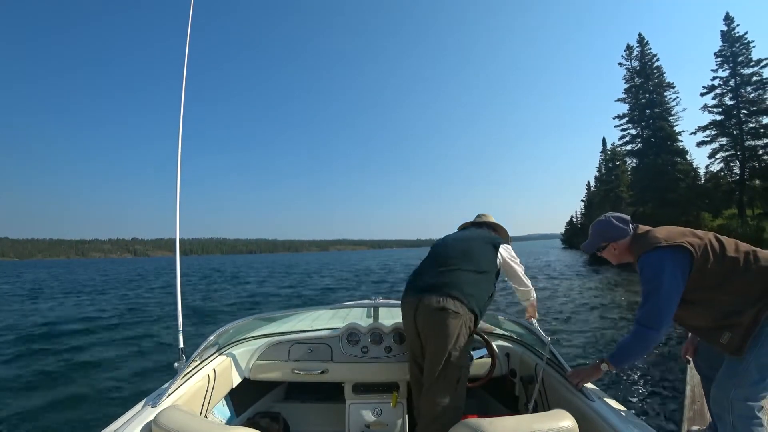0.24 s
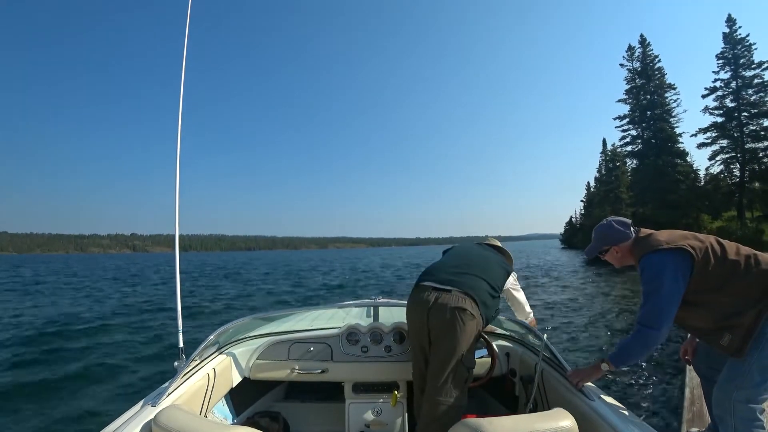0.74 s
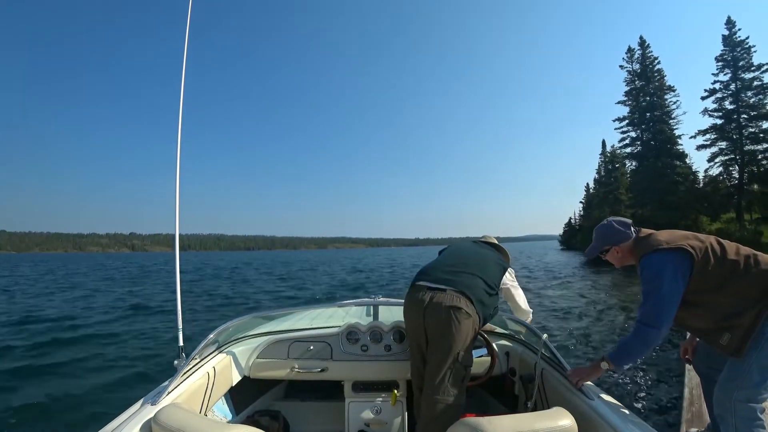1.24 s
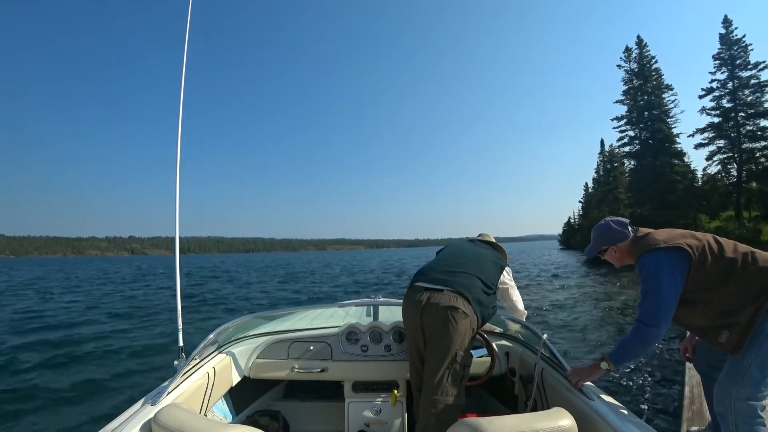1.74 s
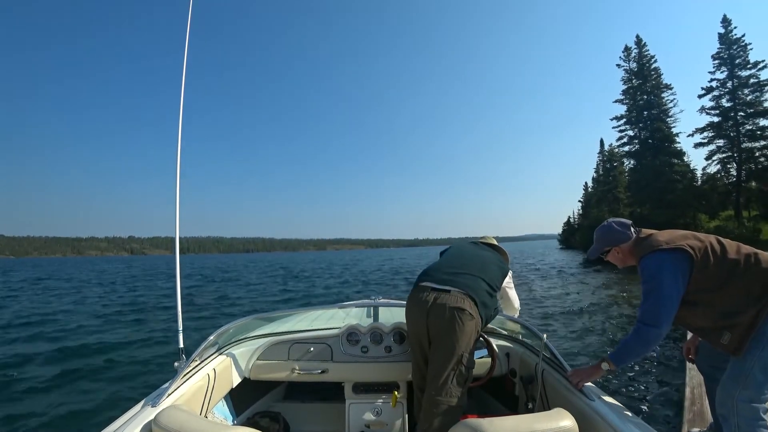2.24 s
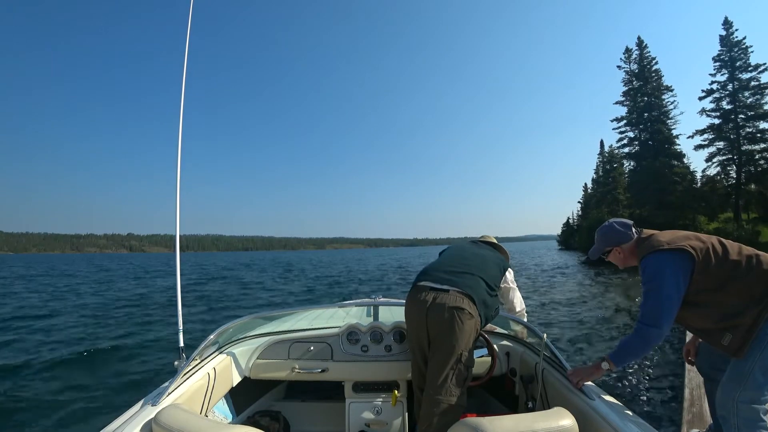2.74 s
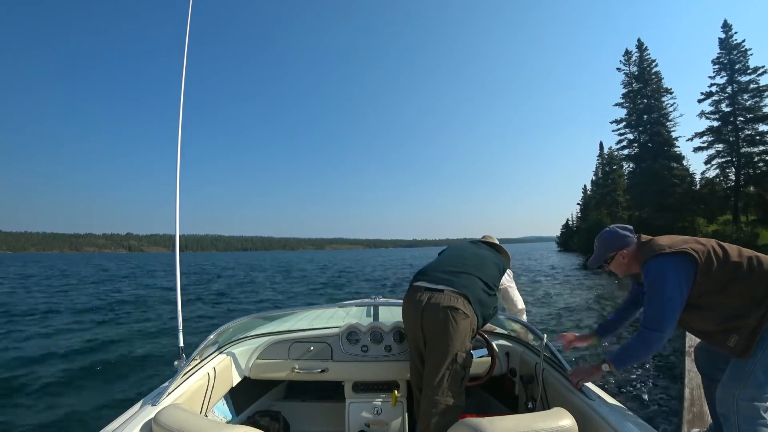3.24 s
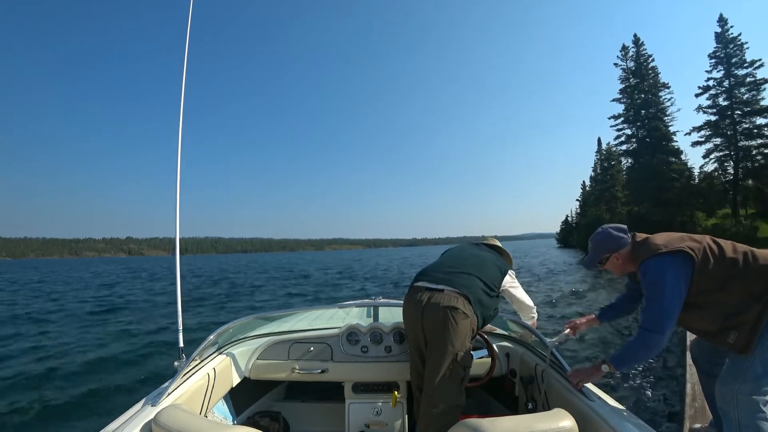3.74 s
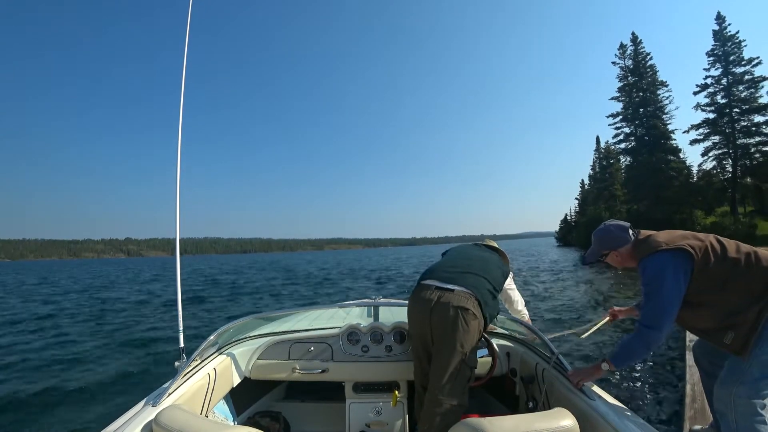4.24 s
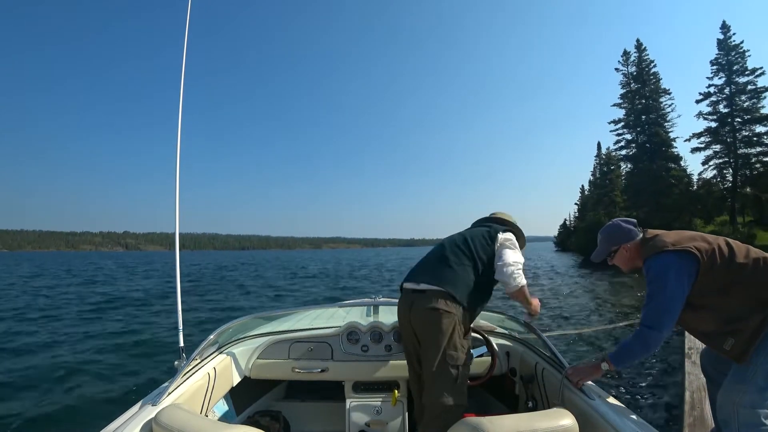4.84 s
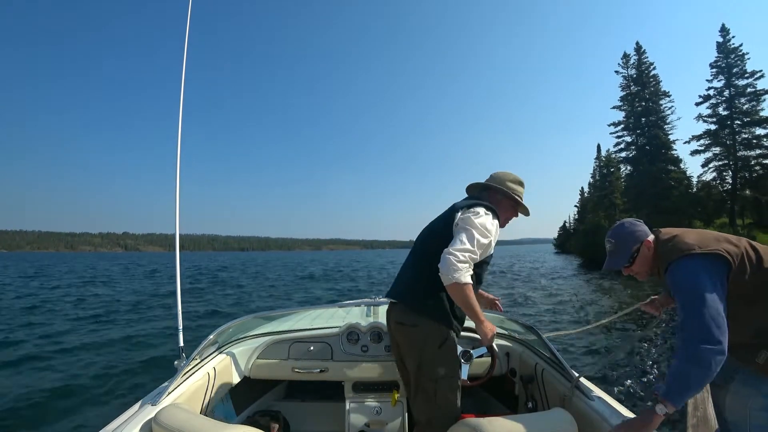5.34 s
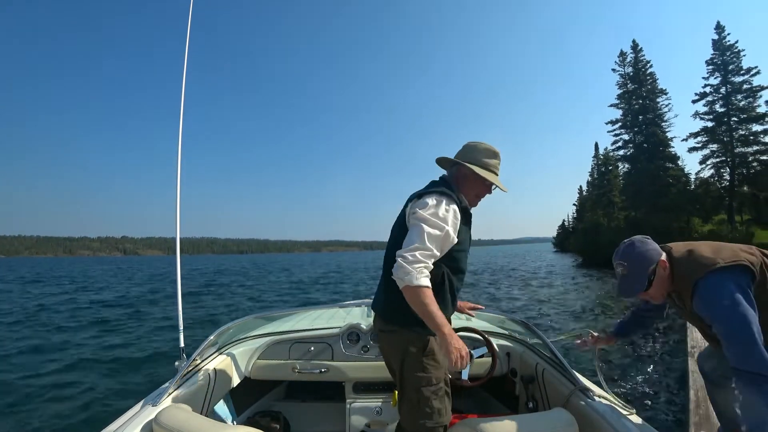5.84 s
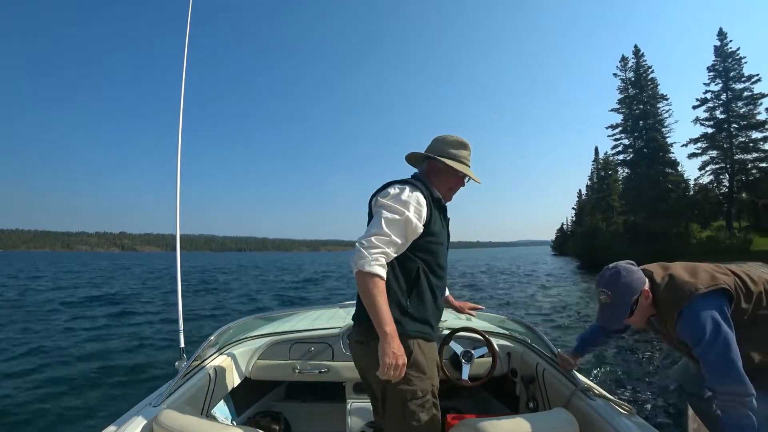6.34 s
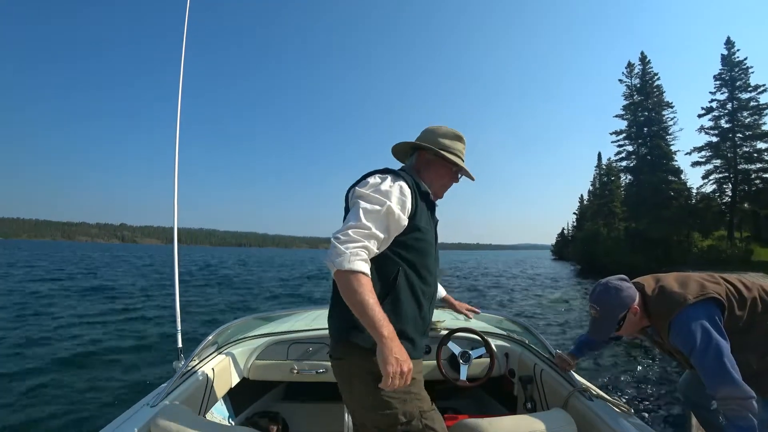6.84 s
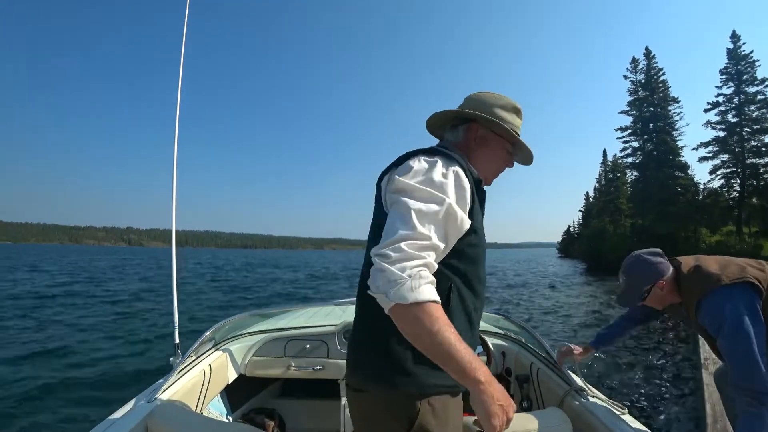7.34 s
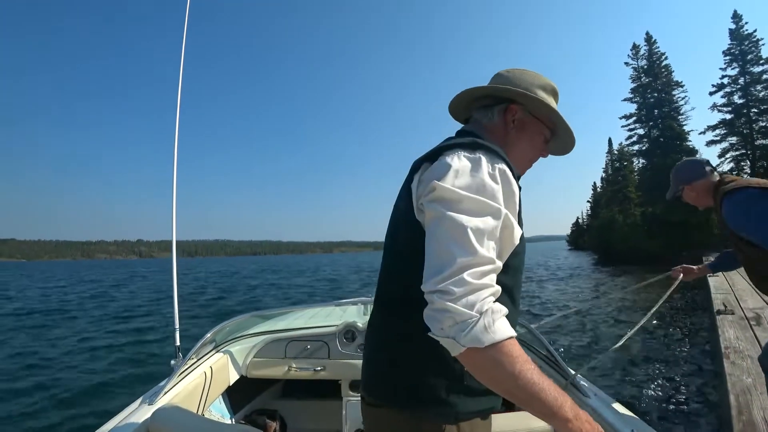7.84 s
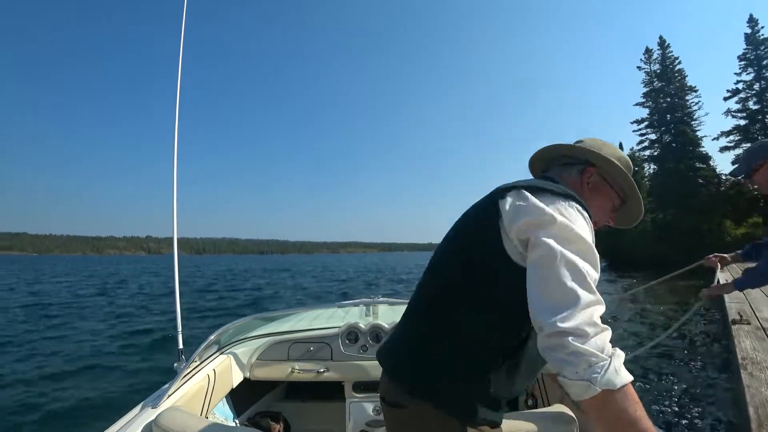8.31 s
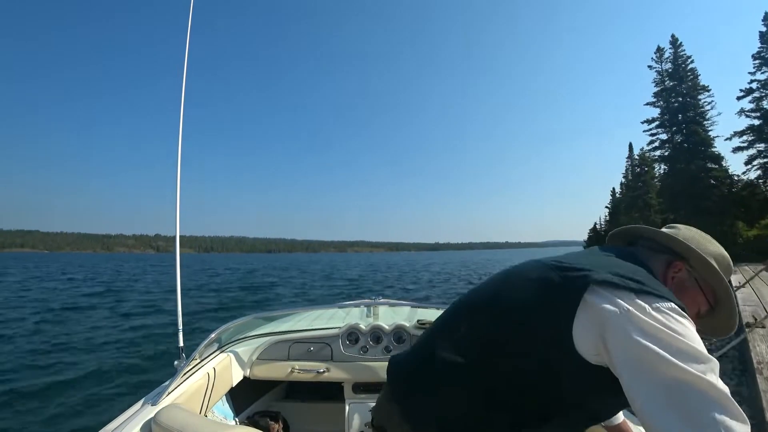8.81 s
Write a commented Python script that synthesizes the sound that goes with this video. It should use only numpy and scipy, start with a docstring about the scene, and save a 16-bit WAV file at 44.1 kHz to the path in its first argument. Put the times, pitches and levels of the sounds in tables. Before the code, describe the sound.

Water slaps, gulps and gurgles against a small moored motorboat while a deep boom throbs and wind gusts buffet, heard muffled from on board.

```python
"""At the dock of a breezy lake, on board a small open motorboat, engine off; two camera ports listen from a closed case.
Filtered noise makes swells boom in one deep resonance, gusts buffet the boat and waves slap and spray the hull.
Decaying sines make the gulping air pockets, waterline gurgles and knocking panels; the knocks rattle with noise too.
Farther off is the even wash of the lake, as shaped noise with the camera's hiss; its circuits whine as thin tones.
Late on, a fitting chirps under the rope and small fittings tick as it is handled."""
import sys
import numpy as np
from scipy import signal
from scipy.fft import rfft, irfft
from scipy.io import wavfile
from scipy.ndimage import uniform_filter1d

SR = 44100
rng = np.random.default_rng(int(sys.argv[2]) if len(sys.argv) > 2 else 0)


def unload_audio(sound):
    """Save the sound as a 16-bit wav file, at the path given as the first command line argument."""
    columns = np.transpose(np.atleast_2d(sound))
    # keep every value between -1 and 1, then stretch to whole-number steps
    steps = np.round(np.clip(columns, -1, 1) * 32767)
    wavfile.write(sys.argv[1], SR, steps.astype(np.int16))


N = 399987
TIME = np.arange(N) / SR


def undb(db):
    """Decibels to amplitude gain."""
    return 10 ** (np.asarray(db) / 20)


def unit(x):
    """Scale to rms 1."""
    return x / np.sqrt(np.mean(x ** 2))


def curve(rows):
    """A (seconds, value) table joined by straight lines."""
    return np.interp(TIME, *np.transpose(rows))


def walk(rate):
    """Smooth chance with rms 1, drawing a new target about rate times a second."""
    hold = int(SR / rate)
    steps = np.repeat(rng.standard_normal(N // hold + 1), hold)
    return unit(uniform_filter1d(steps, hold)[:N])


def band(x, lo_hz, hi_hz, order=2):
    """Causal band-pass."""
    sos = signal.butter(order, [lo_hz, hi_hz], "band", fs=SR, output="sos")
    return signal.sosfilt(sos, x)


def resonate(x, hz, width_hz):
    """One resonance, gain 1 at its centre."""
    return signal.lfilter(*signal.iirpeak(hz, hz / width_hz, fs=SR), x)


def coloured(noise, points):
    """Give noise a spectrum drawn through (Hz, dB) points on a log frequency axis, rms 1."""
    hz, db = np.transpose(points)
    bins = np.arange(N // 2 + 1) * SR / N
    gain = undb(np.interp(np.log(bins + 1), np.log(hz), db))
    return unit(irfft(rfft(noise) * gain, N))


def ports(mid, side):
    """Common and opposed parts to the left and right ports."""
    return np.array([mid + side, mid - side])


# What hull and case ring with.
# Each row: pitch in Hz, width in Hz, gain in dB common to both ports, gain in dB opposed between them.
MODES = [(120, 11, -7.5, -13), (151.9, 23.2, -1.5, -22), (207, 54.4, -5, -4), (245.7, 6.4, -4.5, -2),
         (284.7, 14, -9.5, -18), (345.4, 25.5, -4, 2), (405.5, 24, -13, -17.5), (449.7, 9.5, -7, -37),
         (611.2, 21, -10, -37), (685, 44, -36, -18), (753, 56, -17, -7), (1063, 93, -5, -5.5),
         (1260, 630, -12.5, -15)]


def hull(push, lean=0.7):
    """Two unrelated pushes ring the modes; the dock side, to the right, is a little louder."""
    across = push[1] - lean * push[0]
    mid = sum(undb(db) * resonate(push[0], hz, width) for hz, width, db, _ in MODES)
    side = sum(undb(db) * resonate(across, hz, width) for hz, width, _, db in MODES)
    return ports(mid, side)


# Swells under the boat that set the deep resonance booming.
# Each row: crest in seconds, level in dB, time from crest to 1/e on the falling side in seconds.
SWELLS = [(0.022, -31.5, 0.051), (0.161, -33, 0.059), (0.578, -29, 0.051), (0.796, -25, 0.019),
          (0.877, -28.5, 0.014), (1.028, -37, 0.29), (1.81, -39, 0.1), (2.017, -32, 0.039),
          (2.55, -35.5, 0.054), (2.892, -24, 0.043), (3.21, -38.5, 0.069), (3.706, -30.5, 0.11),
          (3.878, -29, 0.1), (4.605, -27.5, 0.044), (4.686, -27, 0.02), (5.035, -40, 0.22),
          (5.403, -26, 0.038), (5.468, -29.5, 0.095), (5.695, -36.5, 0.07), (5.861, -31, 0.059),
          (6.2, -34.5, 0.061), (6.323, -27, 0.031), (6.421, -25, 0.078), (6.86, -32.5, 0.042),
          (7.067, -18, 0.064), (7.144, -22, 0.073), (7.357, -24.5, 0.016), (7.419, -29, 0.041),
          (7.574, -32.5, 0.049), (7.972, -34, 0.16), (8.62, -34.1, 0.12), (8.769, -26, 0.014),
          (8.869, -24.5, 0.08)]
SWELL_RISE, SWELL_ROUNDNESS = 0.78, 1.96  # rise time as a share of the fall; 2 = bell-shaped crest
CHOP_DB, CHOP_SPREAD_DB, CHOP_PER_S = -47, 5, 16  # small waves keep it stirring between the swells
BOOM_HZ, BOOM_WIDTH_HZ = 63.5, 10.8  # width of each of two resonances in a row


def heave():
    """Strength of the boom: each swell builds and ebbs in one rounded arch, over restless chop."""
    power = undb(CHOP_DB + CHOP_SPREAD_DB * walk(CHOP_PER_S)) ** 2
    for crest, db, length in SWELLS:
        away = np.abs(TIME - crest) / np.where(TIME < crest, SWELL_RISE * length, length)
        arch = np.exp(-np.minimum(away, 10) ** SWELL_ROUNDNESS)
        power = power + (undb(db) * arch) ** 2
    return np.sqrt(power)


def boom(rumble_db=-15.0, rumble_follow=0.68, side_db=-13, shudder_db=-23):
    """A narrow resonance throbs and wanders in pitch, with rumble and shudder around it and eddies opposed at the ports."""
    strength = heave()
    ring = rng.standard_normal(N)
    for _ in range(2):
        ring = resonate(ring, BOOM_HZ, BOOM_WIDTH_HZ)
    ring = signal.hilbert(ring)
    # the small power evens out the resonance's own throbbing
    tone = unit(band(np.abs(ring) ** .2 * np.cos(np.angle(ring)), 46, 84))
    # the rumble follows the swells less than fully
    mean = strength.mean()
    rumble = unit(band(rng.standard_normal(N), 30.7, 48.4)) * mean * (strength / mean) ** rumble_follow
    shudder = unit(band(rng.standard_normal(N), 73, 98.5, order=3))
    eddies = unit(band(rng.standard_normal(N), 49.2, 80.0))
    throbbing = strength * ports(tone + undb(shudder_db) * shudder, undb(side_db) * eddies)
    return throbbing + undb(rumble_db) * rumble


# Wind buffeting the boat, and gurgling water between the slaps.
# Each row: time in seconds, gust level in dB, to which each sound adds its own offset.
GUST = [(0.0, -38), (0.33, -66.5), (1.79, -57), (1.94, -43), (2.17, -63.5), (3.08, -61), (3.28, -52.5),
        (4.05, -50.5), (4.45, -58), (4.8, -53), (5.13, -61), (6.09, -61), (6.19, -44), (6.5, -53),
        (7.2, -45.5), (8.0, -50), (8.45, -55), (8.74, -43), (9.0, -50)]


def buffeting(deep_db=4, light_db=-1.0, light_follow=0.82, flutter_db=3, tumble_db=3, split_hz=250, top_hz=560):
    """Fluttering pressure shakes the lower modes; a strong gust feeds the deep eddies more than the light ones."""
    gust = curve(GUST)
    shaken = hull(rng.standard_normal((2, N)) * undb(flutter_db * walk(30)))
    deep = unit(band(shaken, 70.4, split_hz, order=3) * undb(tumble_db * walk(11)))
    light = unit(band(shaken, split_hz, top_hz) * undb(tumble_db * walk(17)))
    light_gust = gust.mean() + light_follow * (gust - gust.mean())
    return deep * undb(gust + deep_db) + light * undb(light_gust + light_db)


# The far wash of the lake and the hiss: the part common to both ports.
# Each row: frequency in Hz, relative density in dB per Hz.
WASH_MID = [(100, 5.5), (250, -7), (460, -4), (540, -9.5), (880, -6.5), (1140, 1.5), (1260, -2.5),
            (1970, -5), (2060, -10), (3200, -18), (5300, -20), (6000, -23.5), (8400, -23), (9100, -26.5),
            (10200, -21.5), (15500, -24)]
# The part opposed between the ports.
# Each row: frequency in Hz, relative density in dB per Hz.
WASH_SIDE = [(100, 4), (230, -3), (370, 1.5), (950, 4.5), (1500, 3.5), (1900, 5), (2100, -0.5), (2600, -7),
             (5000, -15.5), (7000, -21), (9100, -22.5), (10700, -20), (12500, -25)]
WASH_MID_DB, WASH_SIDE_DB = -58.5, -55.5  # rms levels


def lake(shore_share=0.4):
    """Distant wavelets and wind in trees merge to an even wash, dulled by the case; the shore's part trails on the left."""
    near, wide = rng.standard_normal((2, N))
    late = signal.hilbert(near).imag  # a quarter cycle behind at every frequency
    mid = coloured(near, WASH_MID) * undb(WASH_MID_DB)
    side = coloured(wide + shore_share * late, WASH_SIDE) * undb(WASH_SIDE_DB)
    return ports(mid, side)


# The camera's circuits, right at the ports, sing briefly about twice a second.
# Each entry: start in seconds.
WHINES = [0, .51, 1.49, 1.93, 2.46, 3.011, 3.541, 4.53, 5.08, 5.51, 6.05, 6.481, 7.462, 8.0, 8.42]


def circuits(whine_hz=5570.0, whine_db=-70, length_s=0.091, whistle_hz=10590, waver_hz=70, flicker_db=1,
             whistle_db=-78.0, throb_hz=30, throb_db=2.5):
    """Short electrical whines on the left, over a thin wavering whistle that throbs evenly."""
    on = sum(1. * ((TIME > s) & (TIME < s + length_s)) for s in WHINES)
    gate = uniform_filter1d(on, size=200)  # softened edges
    whine = undb(whine_db) * gate * np.sin(2 * np.pi * whine_hz * TIME)
    throb = throb_db * np.sin(2 * np.pi * throb_hz * TIME)
    level = undb(whistle_db + throb + flicker_db * walk(140))
    phase = 2 * np.pi * np.cumsum(whistle_hz + waver_hz * walk(150)) / SR
    whistle = level * np.sin(phase)
    return np.array([whine + whistle, whistle])


SPLASH_TOP_HZ, SPLASH_TOP_AT_DB, SPLASH_DB_PER_OCTAVE = 674, -34.5, 62.5  # a harder splash reaches higher
THUMP_DB_PER_OCTAVE = 68  # a wave that is more thump than splash is duller


def splash_top(thump_db, splash_db):
    """Upper edge of a splash in Hz: higher the harder it is, lower the more the thump outweighs it."""
    octaves = (splash_db - SPLASH_TOP_AT_DB) / SPLASH_DB_PER_OCTAVE + (splash_db - thump_db) / THUMP_DB_PER_OCTAVE
    return SPLASH_TOP_HZ * 2 ** octaves


# Waves that hit the hull.
# Each row: start in seconds, rise in seconds, thump in dB and splash in dB, each before its common offset.
SLAPS = [(0, 0.0089, -34.5, -47), (0.091, 0.027, -42.5, -45.5), (0.495, 0.033, -48, -48.5),
         (0.742, 0.019, -43, -38.5), (0.913, 0.012, -34, -45.5), (0.996, 0.0081, -30, -36),
         (1.049, 0.0059, -32, -51), (1.274, 0.014, -40.5, -42), (1.452, 0.014, -33.5, -42.5),
         (1.657, 0.0068, -58, -50), (1.949, 0.014, -32, -50), (2.138, 0.0047, -43.5, -49.5),
         (2.478, 0.016, -36, -49), (2.58, 0.017, -30.5, -48), (3.205, 0.0088, -43, -50.5),
         (3.647, 0.0055, -37, -59), (3.772, 0.021, -37, -46), (3.976, 0.0037, -44, -50),
         (4.546, 0.018, -31, -38.5), (4.675, 0.013, -32.5, -46.5), (4.995, 0.036, -47, -48),
         (5.34, 0.033, -30.5, -43), (5.803, 0.0021, -40, -64), (5.987, 0.0038, -36.5, -40.5),
         (6.085, 0.0043, -44, -49.5), (6.13, 0.0029, -37, -40.5), (6.156, 0.0026, -28.5, -33),
         (6.258, 0.014, -32, -36.5), (6.625, 0.012, -42.5, -51.5), (6.856, 0.011, -37, -45),
         (7.835, 0.019, -44.5, -43.5), (8.076, 0.015, -46, -54), (8.146, 0.0066, -43, -47),
         (8.633, 0.013, -40.5, -46)]
FALL_AT_RISE_S, FALL_FOLLOWS_RISE = 0.0095, 0.84  # a wave that lands abruptly is also over sooner


def slaps(fall_s=0.026, grain_db=3.5, deep_hz=130, split_hz=310, thump_db=-1, splash_db=3.0,
          drain_db=-20, drain_s=0.13, run_up_db=-14, run_up_s=0.017):
    """Each wave runs up the hull, lands as a quick cluster of little impacts, and drains off."""
    # fall_s and drain_s hold for a wave that rises in FALL_AT_RISE_S
    count, lead = SR // 2, SR // 20
    t = (np.arange(count) - lead) / SR
    out = np.zeros((2, N + count))
    for s, rise, low_db, high_db in SLAPS:
        before = np.maximum(rise - t, 0)
        hurry = (FALL_AT_RISE_S / max(rise, .001)) ** FALL_FOLLOWS_RISE
        after = np.maximum(t - rise, 0) * hurry
        run_up = undb(run_up_db) * np.exp(-before / run_up_s)
        arrive = np.maximum(np.clip(t / max(rise, .002), 0, 1), run_up)
        force = arrive * (np.exp(-after / fall_s) + undb(drain_db) * np.exp(-after / drain_s))
        # each little impact lasts 90 samples
        grain = np.repeat(rng.standard_normal(count // 90 + 1), 90)[:count]
        impacts = rng.standard_normal((2, count)) * undb(grain_db * grain)
        ring = hull(force * impacts)
        thump = band(ring, deep_hz, split_hz, order=2)
        top_hz = max(splash_top(low_db, high_db), split_hz + 80)
        splash = band(ring, split_hz, top_hz, order=3)
        start = max(int(s * SR), 0)
        for part, db in ((thump, low_db + thump_db), (splash, high_db + splash_db)):
            loudest = np.sqrt(uniform_filter1d(np.mean(part ** 2, axis=0), size=600).max())
            out[:, start:start + count] += part * undb(db) / loudest
    return out[:, lead:lead + N]


def bubbles(rows, swell_s, glide, glide_s=0.005, right_lag=1.59):
    """Air pockets (s, Hz, dB, t60 s) swell, ring and settle in pitch as they open; the right port lags in radians."""
    count = SR // 2
    t = np.arange(count) / SR
    out = np.zeros((2, N + count))
    for s, hz, db, t60 in rows:
        phase = 2 * np.pi * np.cumsum(hz * (1 + glide * np.exp(-t / glide_s))) / SR
        shape = (1 - np.exp(-t / swell_s)) ** 2 * np.exp(-np.log(1000) * t / t60)
        start = int(s * SR)
        ring = np.sin([phase, phase - right_lag])
        out[:, start:start + count] += undb(db) * shape / shape.max() * ring
    return out[:, :N]


# Air pockets trapped under the hull.
# Each row: start in seconds, settled pitch in Hz, peak level in dB, 60 dB decay time in seconds.
GULPS = [(.002, 195, -38.5, 0.21), (.33, 150.8, -39.5, 0.87), (.91, 199, -25, 0.13), (.94, 152, -23, 0.28),
         (1.005, 362, -32, 0.092), (1.05, 440, -33.5, 0.081), (1.76, 147.7, -30, 0.43),
         (1.905, 212, -36.5, 0.18), (2.5, 156, -29.5, 0.21), (2.592, 311, -42, 0.12),
         (2.606, 213, -28, 0.19), (3.108, 133, -40.5, 0.2), (3.28, 160.4, -36, 0.19), (3.4, 274, -44, 0.21),
         (3.653, 206, -28.5, 0.061), (4.282, 193, -41, 0.25), (4.575, 173, -30.5, 0.15),
         (4.745, 158, -33, 0.21), (5.44, 198, -27.5, 0.1), (5.988, 246, -30.5, 0.042),
         (6.128, 332, -27, 0.024), (6.24, 165, -31, 0.044), (6.87, 245, -33, 0.18),
         (7.275, 149.4, -33, 0.3), (7.315, 230.5, -32.5, 0.23), (7.47, 226, -39, 0.33),
         (7.495, 352, -40.5, 0.16), (8.075, 291, -41, 0.29), (8.735, 351, -42, 0.19),
         (8.771, 150, -28.5, 0.21), (8.99, 194, -37.5, 0.27)]


def gulps():
    """Large pockets of air trapped under the hull ring as they settle down in pitch."""
    return bubbles(GULPS, swell_s=0.0041, glide=0.062)


def lapping(count=150, low_hz=140, high_hz=640, gain_db=3, scatter_db=3, octave_db=-4, cycles=24):
    """Small gurgles along the waterline, rising in pitch; they are louder in the gusts."""
    when, size = rng.random((count, 2)).T
    s = when * (N - 1) / SR
    hz = low_hz * (high_hz / low_hz) ** size
    db = np.interp(s, *np.transpose(GUST)) + gain_db
    db = db + octave_db * np.log2(hz / low_hz) + scatter_db * rng.standard_normal(count)
    return bubbles(zip(s, hz, db, cycles / hz), swell_s=0.0014, glide=-0.062, right_lag=4.46)


# How far the right port trails the left for a ringing panel.
# Each row: pitch in Hz, lag in radians.
PANEL_LAG = [(450, 0.41), (624, 0.28), (735, 2.4), (1060, 1.6)]
# Hollow knocks of the hull panels.
# Each row: start in seconds, pitch in Hz, level in dB before the common gain, 60 dB decay time in seconds.
KNOCKS = [(1.0, 715, -49, 0.1), (1.48, 452, -38.5, 0.1), (1.482, 700, -45.5, 0.11),
          (1.662, 626, -47.5, 0.22), (1.753, 760, -51, 0.064), (1.759, 640, -47, 0.091),
          (3.459, 740, -49, 0.092), (3.795, 435, -45, 0.12), (4.555, 427, -38.5, 0.15),
          (4.575, 613, -47, 0.22), (4.712, 621, -52.5, 0.27), (4.808, 638, -56.5, 0.3),
          (5.365, 423, -40.5, 0.147), (6.158, 484, -39, 0.17), (6.157, 624, -45, 0.12),
          (7.748, 460, -48, 0.14), (7.848, 1042, -48, 0.083), (7.853, 760, -48, 0.11)]


def knocks(contact_s=0.021, rattle_db=-2, rattle_width_hz=170, gain_db=-4.0):
    """A soft blow sets one hull panel ringing and rattling; the ring's lag between the ports follows its pitch."""
    count = SR // 2
    t = np.arange(count) / SR
    out = np.zeros((2, N + count))
    for s, hz, db, t60 in KNOCKS:
        shape = (1 - np.exp(-t / contact_s)) * np.exp(-np.log(1000) * t / t60)
        phase = 2 * np.pi * hz * t
        lag = np.interp(hz, *np.transpose(PANEL_LAG))
        ring = np.sin([phase, phase - lag])
        rattle = rng.standard_normal((2, count))
        for _ in range(2):
            rattle = resonate(rattle, hz, rattle_width_hz)
        blow = ring + undb(rattle_db) * unit(rattle)
        start = int(s * SR)
        out[:, start:start + count] += undb(db + gain_db) * shape / shape.max() * blow
    return out[:, :N]


# The sharpest waves throw spray against the hull.
# Each row: start in seconds, level in dB before the case dulls it, fall in seconds.
SPRAYS = [(2.573, -55, 0.013), (3.785, -55, .04), (4.552, -52, 0.014), (6.152, -42, .013),
          (6.262, -49.5, .03)]


def sprays(low_hz=600, high_hz=1300, case_hz=1950, attack_s=0.0035):
    """A short, soft crack of water on the hull, as a noise burst dulled by the case."""
    out = np.zeros((2, N))
    for s, db, fall_s in SPRAYS:
        t = np.maximum(TIME - s, 0)
        shape = (1 - np.exp(-t / attack_s)) * np.exp(-t / fall_s)
        water = unit(band(rng.standard_normal((2, N)), low_hz, high_hz))
        out += undb(db) * shape / shape.max() * water
    return band(out, low_hz, case_hz, order=4)


# A fitting on board chirps under the rope.
# Each row: start in seconds, level in dB before roughness and envelope.
SQUEAKS = [(6.025, -73), (7.15, -67)]


def squeaks(hz=4950, fall=0.2, settle_s=0.0069, swell_s=0.002, fade_s=0.026, rough_db=4):
    """Tiny, scratchy chirps that drop in pitch and ring off, alike at both ports."""
    out = np.zeros(N)
    for s, db in SQUEAKS:
        t = np.maximum(TIME - s, 0)
        phase = 2 * np.pi * np.cumsum(hz * (1 + fall * np.exp(-t / settle_s))) / SR
        shape = (1 - np.exp(-t / swell_s)) * np.exp(-t / fade_s)
        out += undb(db + rough_db * walk(270)) * shape * np.sin(phase)
    return np.array([out, out])


# Small fittings on board tick as the rope is handled.
# Each row: start in seconds, pitch in Hz, peak level in dB.
TICKS = [(6.635, 3600, -55), (8.857, 4700, -55)]


def ticks(fall_s=0.011, width_hz=900):
    """Tiny metallic ticks, barely passing the case: decaying noise rings one resonance."""
    count = SR // 10
    out = np.zeros((2, N))
    for s, hz, db in TICKS:
        strike = rng.standard_normal((2, count)) * np.exp(-np.arange(count) / SR / fall_s)
        tick = resonate(strike, hz, width_hz)
        start = int(s * SR)
        out[:, start:start + count] += undb(db) * tick / np.abs(tick).max()
    return out


def scene():
    """Everything that reaches the two ports."""
    wind_and_swell = boom() + buffeting()
    background = lake() + circuits()
    water = slaps() + gulps() + lapping() + sprays()
    fittings = knocks() + squeaks() + ticks()
    return wind_and_swell + background + water + fittings


TOP_HZ = 15720


def record(dry):
    """The recorder cuts the top with a steep low-pass that adds no delay."""
    lowpass = signal.firwin(511, TOP_HZ, window="blackman", fs=SR)
    return signal.fftconvolve(dry, lowpass[None], "same", axes=1)


dry = scene()
out = record(dry)
unload_audio(out)
```